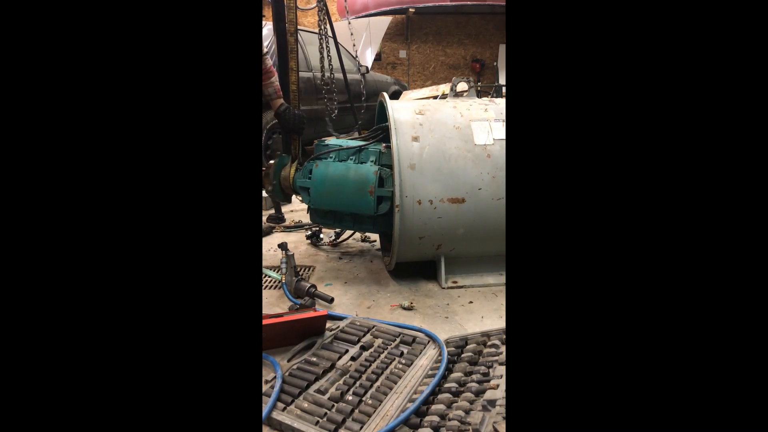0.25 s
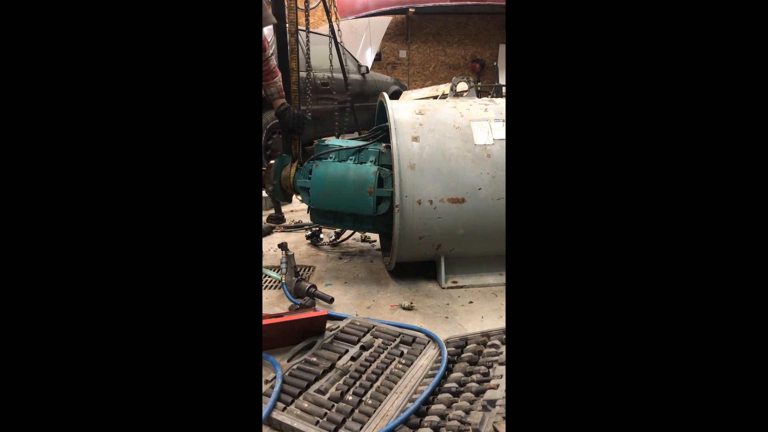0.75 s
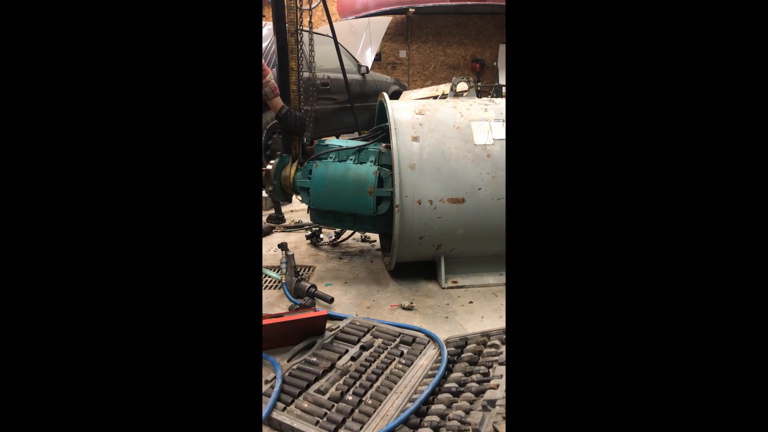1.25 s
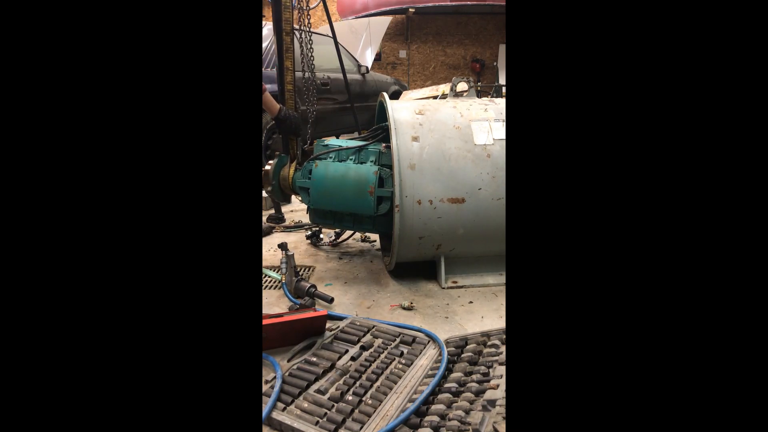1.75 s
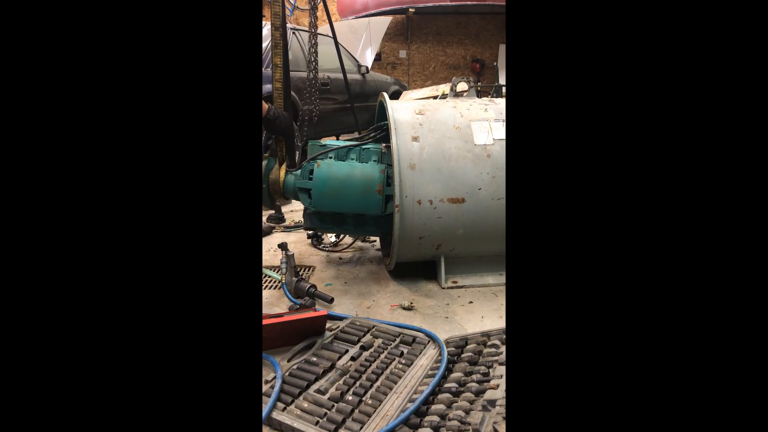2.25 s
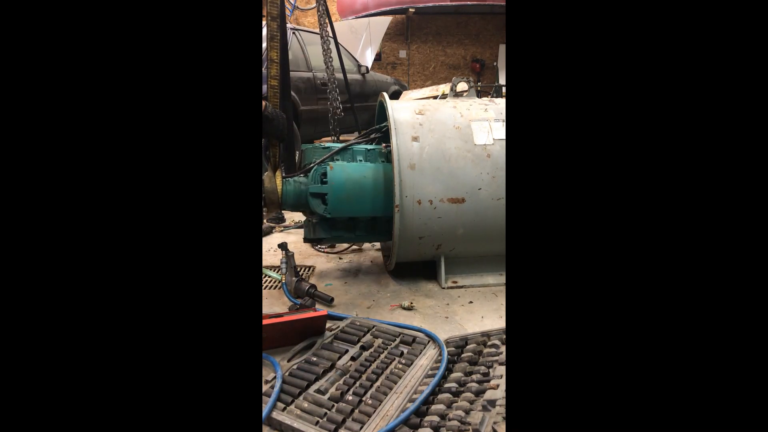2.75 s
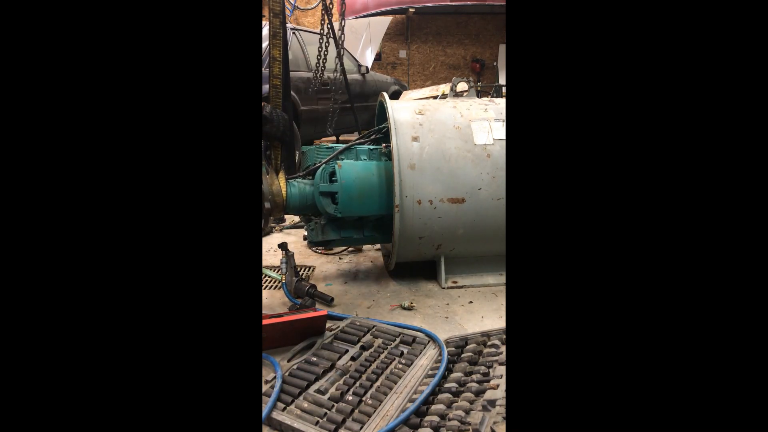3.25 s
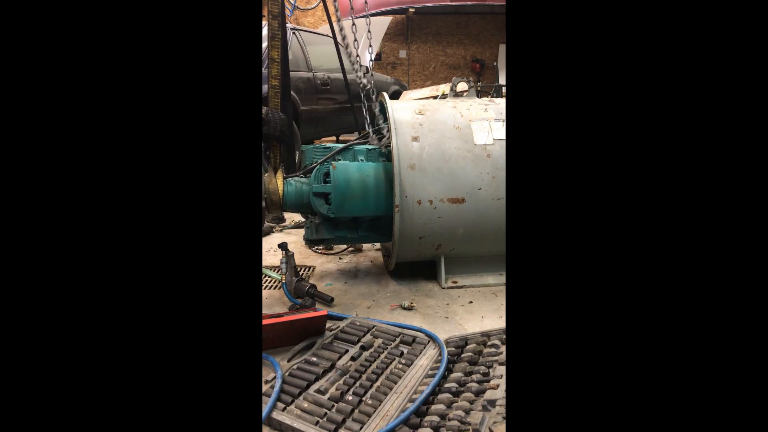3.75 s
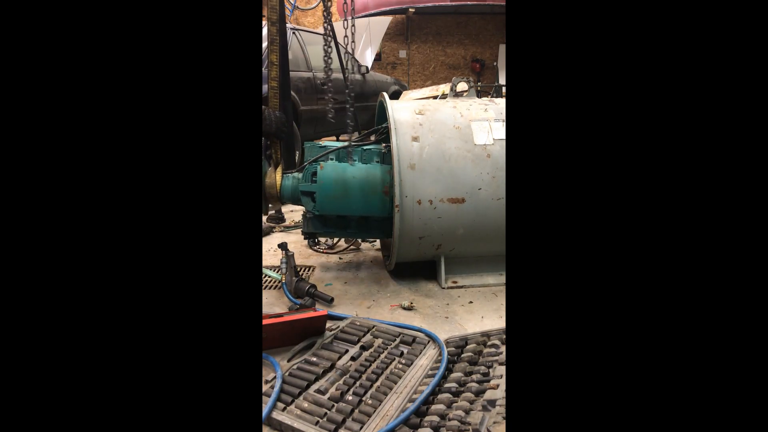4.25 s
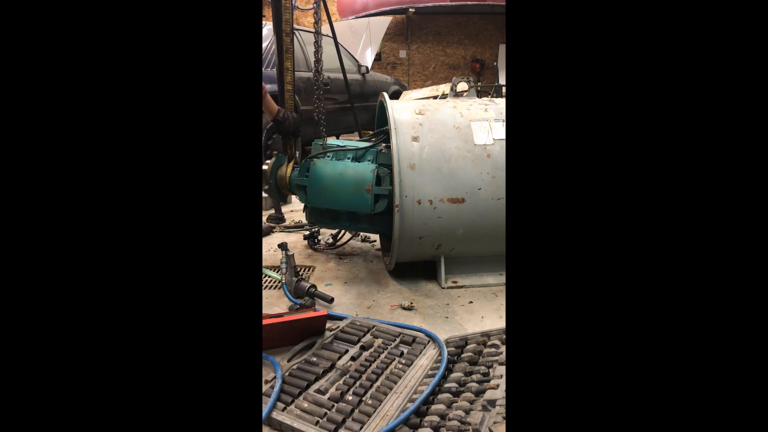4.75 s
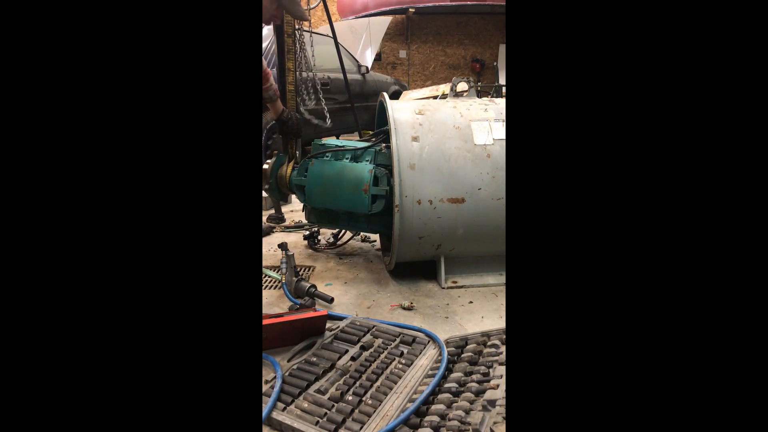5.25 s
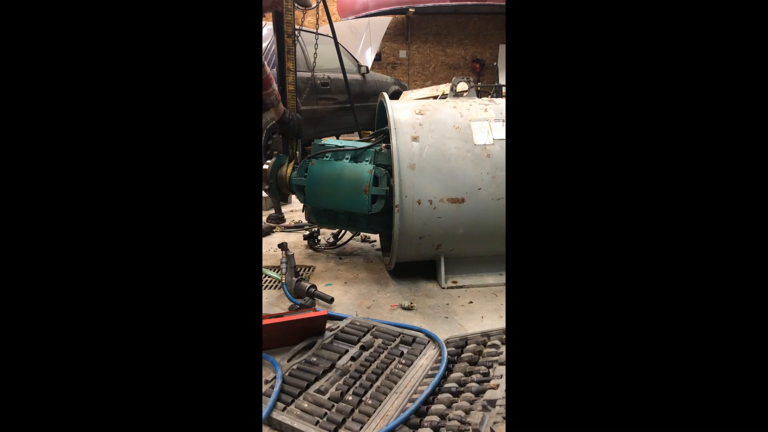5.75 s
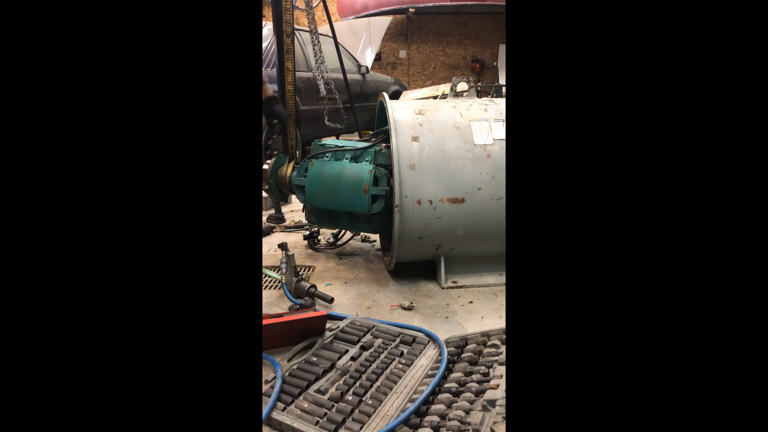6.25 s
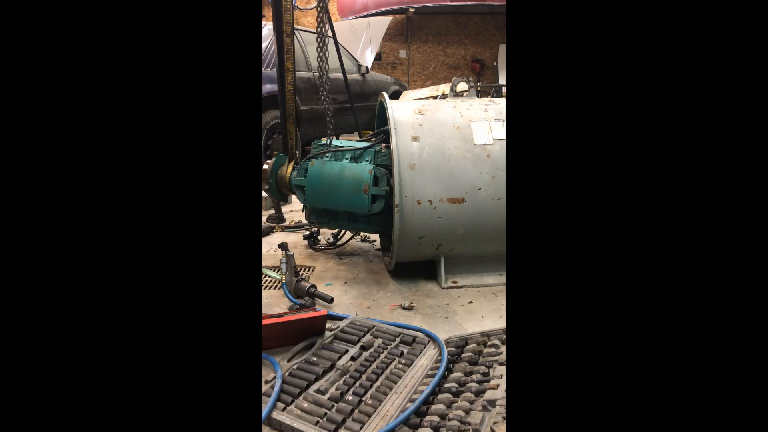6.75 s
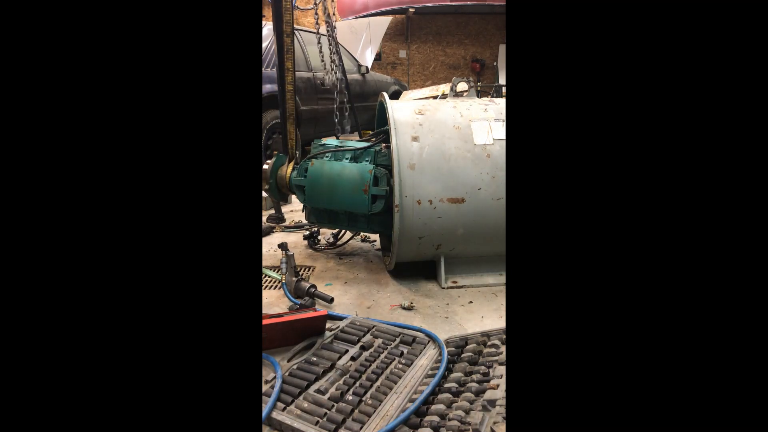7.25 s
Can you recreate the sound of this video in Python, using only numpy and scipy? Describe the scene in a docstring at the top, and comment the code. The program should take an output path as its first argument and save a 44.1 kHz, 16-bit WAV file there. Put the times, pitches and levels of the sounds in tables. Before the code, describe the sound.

A heavy rotor on a chain hoist is shifted in its steel housing in a workshop, heard in mono at fairly close range. At 0 s a short grind and chain rattle fade under small bright link clicks, with a tight cluster near 1.3 s. From 1.9 s stronger clinks arrive, and between 2.2 and 3.3 s rolling grinding, low rumble, soft knocks and chain rattle swell, with brief metallic squeaky tones. It thins out to sparse ticks around 3.4-4 s. Grinding returns from 4.3 to 5.2 s, with sharp clicks and a short tonal creak at 4.85 s. After a lull, chain slides in rapid blows on the housing from 5.55 s, then lands with a huge bright clang at 5.97 s. It rings on, with clinks at 6.2-6.6 s, and is damped after about 6.56 s. Faint air and a few last clicks near 7.4 s finish.

```python
"""A heavy rotor on a chain hoist is rolled in and out of its steel housing in a workshop, in mono.
Its grinding is random grit through bore resonances; the rolling drone and frame rumble are low noise.
Loose links click on each other or tap the housing, as noise bursts with beating rings, and rattle
as many tiny impacts. Slack chain slides down the housing and lands with a loud clang: clear modes and
dense overtones. Around it lie soft knocks, brief tones, air, and the echoes of the clicks in the shop."""
import sys
import numpy as np
from scipy import signal
from scipy.fft import rfft, irfft
from scipy.io import wavfile
from scipy.ndimage import uniform_filter1d

SR = 44100
rng = np.random.default_rng(int(sys.argv[2]) if len(sys.argv) > 2 else 0)


def wav_out(sig):
    """Save sig, one row per channel (or a flat mono array), as 16-bit PCM at SR to the path in sys.argv[1]."""
    wavfile.write(sys.argv[1], SR, np.round(np.clip(np.atleast_2d(sig).T, -1, 1) * 32767).astype(np.int16))


def decibels_to_gain(level_db):
    """Convert a level in decibels to a linear amplitude gain (20 dB per decade)."""
    exponent = np.asarray(level_db, float) / 20
    return 10 ** exponent


N = 330750   # samples, 7.5 s

# the load rolls out, then back in: (time [s], grinding level [dB], frame rumble level [dB])
ROLLING = [(0.0, -46, -38.5), (0.25, -60.5, -46.5), (0.95, -66.5, -63.5), (1.31, -63.5, -61),
           (1.86, -67, -76), (1.97, -66, -53), (2.25, -50, -46), (2.45, -58.5, -63), (2.59, -49, -47.5),
           (2.82, -43, -48.5), (3.22, -52.5, -45), (3.4, -57, -58), (3.94, -66.5, -72), (4.05, -64, -47.5),
           (4.21, -65.5, -56.5), (4.37, -47, -44), (4.68, -42.5, -53), (4.88, -42.5, -37.5),
           (5.02, -40, -44), (5.19, -52, -54), (5.53, -66.5, -63), (6.58, -61.5, -68.5), (7.1, -59, -66),
           (7.24, -72, -89), (7.36, -63, -50), (7.5, -78, -70)]
# stir of the slack chain: (time [s], rattle level [dB])
STIR = [(0.0, -38), (0.25, -61), (0.52, -51.5), (0.95, -71.5), (1.31, -52.5), (1.86, -70.5), (1.97, -58.5),
        (2.25, -46), (2.5, -56), (2.82, -42.5), (2.99, -36), (3.22, -44), (3.4, -63), (3.94, -57.5),
        (4.05, -53), (4.47, -48), (4.52, -46.5), (4.88, -44), (5.02, -45.5), (5.19, -60.5), (5.32, -71),
        (5.35, -54), (5.53, -59.5), (6.58, -53.5), (6.632, -45.5), (7.1, -64.5), (7.24, -70), (7.36, -55),
        (7.5, -47)]
# chain on housing: (time [s], nominal level [dB], brightness about 3 kHz [dB per octave])
BLOWS = [(5.551, -15, -0.5), (5.584, -12, -2), (5.62, -15.5, 0.5), (5.66, -12, -2.5), (5.736, -15.5, -0.5),
         (5.81, -18, -1.5), (5.88, -13.5, -2), (5.92, -13, 0.5), (5.953, -5, 0.5), (5.972, 2, 1),
         (5.982, -0.5, 5), (5.992, -6, 4), (6.602, -21, 0.5)]


def rms_one(x):
    """Scales a sound to rms 1."""
    return x / np.sqrt(np.mean(x ** 2) + 1e-20)


def at_hz(points, hz):
    """Reads a curve of (Hz, value) along log frequency."""
    return np.interp(np.log(hz), np.log(np.array(points)[:, 0]), np.array(points)[:, 1])


def in_time(rows):
    """Draws each column of a timed table as a curve over the scene."""
    s, *columns = np.transpose(rows)
    return [np.interp(np.arange(N) / SR, s, c) for c in columns]


def band(x, low_hz, high_hz):
    """Band-pass filter."""
    return signal.sosfilt(signal.butter(2, [low_hz, high_hz], "band", fs=SR, output="sos"), x)


def shaped(x, spectrum):
    """Colours a sound with a spectrum; rms 1."""
    hz = np.maximum(np.arange(N // 2 + 1) * SR / N, 10)
    return rms_one(irfft(rfft(x) * decibels_to_gain(at_hz(spectrum, hz)), N))


def drift(rate_hz):
    """Slow chance through a double one-pole low-pass, drawn at every 40th sample; spread 1."""
    r = np.exp(-80 * np.pi * rate_hz / SR)
    chance = rng.standard_normal(N // 40 + 2002)
    slow = signal.lfilter([1], [1, -2 * r, r * r], chance)[2000:]
    return np.interp(np.arange(N) / 40, np.arange(len(slow)), rms_one(slow))


def ring(strikes, hz, t60):
    """A damped resonance: a unit click sets a sine of height about 1 ringing."""
    r = decibels_to_gain(-60 / (t60 * SR))
    w = 2 * np.pi * hz / SR
    return signal.lfilter([0, np.sin(w)], [1, -2 * r * np.cos(w), r * r], strikes + 1e-18)


def resonate(x, peaks):
    """A sound through parallel resonances; rms 1."""
    return rms_one(sum(decibels_to_gain(db) * np.sqrt(width) * ring(x, hz, 1.7 / width) for hz, width, db in peaks))


def grains(per_s, spread_db, clump_db):
    """Random tiny impacts of uneven size, coming in clumps."""
    sizes = decibels_to_gain(spread_db * np.minimum(rng.exponential(1, N), 5)) * rng.choice([-1, 1], N)
    return sizes * (rng.random(N) < per_s * decibels_to_gain(clump_db * drift(15)) / SR)


def add(out, s, piece):
    """Lays a piece into the scene at s seconds."""
    at = round(s * SR)
    out[at:at + len(piece)] += piece[:N - at]


def workshop_air():
    """Steady coloured noise under everything."""
    # air spectrum, (frequency [Hz], relative level [dB])
    air_spectrum = [(18, -36.5), (30, -7), (86, 11), (632, 4.5), (760, -26), (962, -4.5), (2170, -12.5),
                    (4080, -7.5), (13000, -19), (16000, -15)]
    return decibels_to_gain(-64.5) * shaped(rng.standard_normal(N), air_spectrum)


def shop(x):
    """Workshop echoes: ten feedback delays, duller on every round, stepped block by block."""
    t60_s, wall_cut_hz, level_db = 0.62, 15500, -16
    out = np.zeros(N)
    dull = np.exp(-2 * np.pi * wall_cut_hz / SR)
    lags = (rng.uniform(.015, 0.041, 10) * SR).astype(int)
    for k, lag in enumerate(lags):
        loop, state = x.copy(), [0.]
        gain = decibels_to_gain(-60 * lag / SR / t60_s)
        for i in range(lag, N, lag):
            back, state = signal.lfilter([gain * (1 - dull)], [1, -dull], loop[i - lag:i], zi=state)
            loop[i:i + lag] += back[:N - i]
        out += (loop - x) * (-1) ** k   # echoes only
    return decibels_to_gain(level_db) * out


def brief_dips():
    """Gain of the noisy layers, whose level dips briefly in bell-shaped notches."""
    # centres of the dips: time [s]
    dip_times = [2.38, 2.982, 3.536, 3.619, 4.342, 4.87, 6.283, 6.415, 6.796]
    depth_db, spread_s = 13.5, .0065
    t = np.arange(N) / SR
    return decibels_to_gain(-depth_db * sum(np.exp(-.5 * ((t - s) / spread_s) ** 2) for s in dip_times))


def tones():
    """Brief tones stand out of the noise: each sine swells for a moment, wavers and dies."""
    # (time [s], pitch [Hz], nominal level [dB])
    tone_table = [(2.11, 1040, -47), (2.87, 990, -46), (2.87, 558, -41), (3.022, 1240, -44),
                  (3.026, 1506, -43), (3.07, 1270, -40), (3.14, 2780, -51), (3.319, 466, -42),
                  (3.419, 457, -53), (3.47, 446, -54.5), (4.04, 2200, -51), (4.046, 2870, -50),
                  (4.846, 1237, -33.5), (4.852, 1750, -40), (4.85, 2290, -35.5), (4.85, 3600, -40),
                  (5.002, 1750, -39.5), (5.06, 1750, -47), (5.972, 349, -45.5), (7.374, 1920, -46)]
    t60_s, swell_s = 0.11, 0.034
    out, t = np.zeros(N), np.arange(round(.5 * SR)) / SR
    noise = rng.standard_normal((len(tone_table), len(t)))
    wavers = 1 + .3 * rms_one(band(noise, 12, 80))
    for (s, hz, level_db), waver in zip(tone_table, wavers):
        envelope = decibels_to_gain(level_db + 19.5 - 60 * t / t60_s) * (1 - np.exp(-t / swell_s))
        add(out, s, waver * envelope * np.sin(2 * np.pi * hz * t))
    return out


def thuds():
    """The load knocks the frame: a soft low knock that sags in pitch, with a dull puff."""
    # (time [s], nominal level [dB], settled pitch [Hz])
    thud_table = [(1.299, -41, 434), (1.322, -38.5, 257), (1.618, -49.5, 260), (1.752, -53, 600),
                  (1.952, -32.5, 181), (2.33, -27.5, 270), (2.749, -30, 262), (2.894, -28.5, 170),
                  (3.172, -26, 199), (4.028, -41, 270), (5.869, -35.5, 165), (6.852, -42, 194),
                  (7.33, -44, 119.5)]
    t60_s, rise_s = .06, 0.0035
    out, t = np.zeros(N), np.arange(round(.3 * SR)) / SR
    puffs = rms_one(band(rng.standard_normal((len(thud_table), len(t))), 86, 400))
    sagging_t = t + 0.0021 * (1 - np.exp(-t / 0.0056))
    for (s, level_db, hz), puff in zip(thud_table, puffs):
        knock = np.sin(2 * np.pi * hz * sagging_t) + 0.66 * puff
        add(out, s, decibels_to_gain(level_db - 60 * t / t60_s) * (1 - np.exp(-t / rise_s)) * knock)
    return out


def clicks():
    """Links click on each other or tap the housing: a three-colour burst, brightest dying first, and a ring."""
    # (time [s], nominal level [dB], ring pitch [Hz], nominal bright edge level [dB],
    #  ring level re the nominal level [dB])
    click_table = [(0.0133, -27, 3490, -30.5, -12), (0.1195, -35, 3520, -38, -19),
                   (0.2299, -51, 5460, -34.5, -4), (0.2736, -37, 5930, -39, -13),
                   (0.367, -26, 6170, -39, -12.5), (0.4206, -28.5, 6740, -41, -16),
                   (0.4653, -27.5, 6120, -38, -12), (0.56, -38, 2900, -53, -18),
                   (0.631, -53, 7150, -37.5, -10), (0.6734, -45.5, 4190, -58, -3),
                   (0.721, -34.5, 4450, -39, -27), (1.2166, -49, 5230, -64, -2),
                   (1.0217, -38, 8000, -32.5, -19), (1.0347, -32, 6940, -32.5, -16),
                   (1.0826, -35, 6940, -39, -19), (1.121, -43, 4200, -47, -13),
                   (1.269, -24.5, 3330, -39, -13), (1.2844, -25, 3280, -51, -15.5),
                   (1.3005, -24.5, 2960, -35, -13), (1.4065, -43.5, 6200, -44, 3.5),
                   (1.5095, -34.5, 2930, -53, -9), (1.575, -46, 2840, -44, -24),
                   (1.8313, -38.5, 6250, -53, -9), (1.9024, -40, 6200, -55, -6),
                   (1.9248, -21, 4640, -23, -19), (1.9602, -38.5, 4150, -29, 0.5),
                   (2.1091, -16.5, 4300, -21.5, -14.5), (2.1378, -24, 4010, -26.5, -10.5),
                   (2.2221, -13, 5000, -19.5, -35), (2.2645, -41, 7300, -25.5, -17),
                   (2.2921, -21.5, 4160, -44, -16.5), (2.3148, -41, 3580, -29, -6),
                   (2.3428, -18.5, 6870, -27.5, -13), (2.53, -35, 3300, -35.5, -28),
                   (2.608, -41, 7100, -31, -9), (2.7871, -23, 3650, -24.5, -18),
                   (2.8257, -29, 2530, -31, -18), (2.8611, -23.5, 3090, -23.5, -12),
                   (2.998, -16.5, 3840, -64, -26), (3.0771, -14.5, 7030, -25, -18),
                   (3.2288, -25, 2835, -38, -11.5), (3.3016, -27, 3830, -44, -17),
                   (3.3795, -29, 3980, -36, -28), (3.5693, -39, 7800, -25.5, -10),
                   (3.597, -34, 7600, -32.5, -22), (3.7264, -39, 7000, -38, -14),
                   (3.7997, -34, 4020, -38, -17), (3.9674, -48, 4260, -41, -12),
                   (4.0317, -30, 4300, -57, -26), (4.0495, -25.5, 3170, -47, -11),
                   (4.1519, -19.5, 5120, -31.5, -23), (4.2188, -38, 5590, -36, -10),
                   (4.241, -27, 6160, -30.5, -21), (4.4982, -13.5, 6680, -23, -17),
                   (4.5632, -37, 3830, -27, -0.5), (4.7198, -26.5, 3540, -26.5, -9.5),
                   (4.8164, -44, 3180, -26, -26), (4.8838, -16, 2570, -26.5, -44),
                   (5.3389, -37, 4040, -57, -11.5), (6.219, -16, 3340, -26.5, -34),
                   (6.2429, -26, 3110, -26, -19), (6.3242, -22, 3050, -32, -24),
                   (6.442, -30, 3120, -37.5, -22), (6.495, -38, 3200, -28, -17),
                   (6.6033, -16.5, 5960, -32, -16.5), (6.6218, -17, 6180, -29, -21),
                   (6.8074, -38, 3270, -43, -23), (7.3062, -42.5, 7530, -37, -21),
                   (7.334, -45.5, 7000, -40.5, -17), (7.3788, -27, 6560, -43, -14),
                   (7.42, -16.5, 6220, -27, -26)]
    body_re_level_db, body_db_per_octave = -21.5, -7   # lower rings have more dull body
    # two more modes beside the main ring
    overtone_ratio, overtone_db, undertone_ratio, undertone_db = 1.3, -8, 0.55, -12.5
    out, t = np.zeros(N), np.arange(round(.3 * SR)) / SR
    noise = rng.standard_normal((len(click_table), len(t)))
    middle = rms_one(band(noise, 2550, 9600))
    edge = rms_one(band(noise, 6850, 19800))
    body = rms_one(band(noise, 744, 4280))
    beats = rms_one(band(noise, 15, 250))   # close modes beat against each other
    rise = 1 - np.exp(-t / 0.00097)
    for k, (s, level_db, hz, edge_db, ring_db) in enumerate(click_table):
        near_ring = rms_one(band(noise[k], hz / 1.71, hz * 1.69))
        colour = (1.53 + 5.4 * np.exp(-t / 0.00072)) * middle[k] + near_ring
        burst = decibels_to_gain(level_db - 19.5 - 60 * t / 0.075) * colour
        crack = np.exp(-t / 0.00057) + 0.23 * decibels_to_gain(-60 * t / 0.052)   # a crack leads
        burst += decibels_to_gain(edge_db + 10.0) * crack * edge[k]
        body_db = level_db + body_re_level_db + body_db_per_octave * np.log2(hz / 4000)
        burst += decibels_to_gain(body_db - 60 * t / 0.2) * body[k]
        turn = 2 * np.pi * hz * t
        ringing = (1 + .45 * beats[k]) * np.sin(turn)
        ringing += decibels_to_gain(overtone_db) * beats[k - 1] * np.sin(overtone_ratio * turn)
        ringing += decibels_to_gain(undertone_db) * np.sin(undertone_ratio * turn)
        add(out, s, rise * (burst + decibels_to_gain(level_db + ring_db - 60 * t / 0.082) * ringing))
    return out


def jingle():
    """Small contacts dealt to links of many sizes, each ringing briefly at its own pitch."""
    touches = grains(2500, spread_db=3.0, clump_db=3.5)
    dealt = rng.integers(0, 24, N)
    pitches = np.geomspace(1300, 9000, 24) * rng.uniform(1.0, 1.04, 24)
    return sum(ring(touches * (dealt == k), hz, 134.0 / hz) for k, hz in enumerate(pitches))


def chain_rattle():
    """Stirred slack chain: many small link contacts, dry and ringing, in one colour."""
    # (frequency [Hz], relative level [dB])
    rattle_spectrum = [(880, -2.5), (1500, -8), (2020, -10), (2570, -4.5), (2860, -4.5), (3200, -1.5),
                       (3800, -1.5), (4300, -1), (4800, -3.5), (9000, -4.5), (11700, -28.5), (19800, -120)]
    rattle_db, = in_time(STIR)
    links = rms_one(grains(2500, spread_db=-1.0, clump_db=5.0)) + 1.3 * rms_one(jingle())
    return decibels_to_gain(rattle_db) * shaped(links, rattle_spectrum)


def chain_sizzle():
    """The finest link contacts, top treble only; swings with the rattle about its mean."""
    re_rattle_db, follows, stir_mean_db = -6.0, 1, -45
    rattle_db, = in_time(STIR)
    sizzle_db = stir_mean_db + re_rattle_db + follows * (rattle_db - stir_mean_db)
    return decibels_to_gain(sizzle_db) * rms_one(band(grains(2000, spread_db=5.0, clump_db=7.5), 8000, 19845))


def stored(at, blow_db, t60, rise_s):
    """Amplitude of a vibration whose energy each blow tops up; it spreads over the shell, then dies."""
    energy, spread = np.zeros(N), np.exp(-1 / (rise_s * SR))
    energy[at] = decibels_to_gain(2 * blow_db)
    energy = signal.lfilter([1 - spread], [1, -spread], energy + 1e-18)
    return np.sqrt(signal.lfilter([1], [1, -decibels_to_gain(-120 / (t60 * SR))], energy))


def overtones():
    """Hundreds of close narrow modes at chance pitches over a noise bed; two unrelated sets."""
    hz = np.arange(N // 2 + 1) * SR / N
    lines = rng.random((2, len(hz))) < SR / N / 70   # one every 70 Hz on average
    lines = lines * decibels_to_gain(1.2 * rng.standard_normal((2, len(hz))))
    comb = uniform_filter1d(lines, size=90, axis=1)
    comb = uniform_filter1d(comb, size=90, axis=1)   # each about 12 Hz wide
    return rms_one(irfft(rfft(rng.standard_normal((2, N))) * (rms_one(comb) + .85), N))


def clang_rings():
    """Every chain blow feeds the clear modes of the housing, with strengths of its own."""
    # clear modes of the housing: pitch [Hz]
    mode_pitches = [963.5, 1233, 1496.5, 1514, 1630, 2212, 2353, 2612, 2721, 2982, 3115, 3240, 4050, 4430,
                    4605, 6155, 6445, 6570, 7968, 8150, 8490, 11250, 13374, 13418]
    # for each: (relative level [dB], t60 before damping [s], change under a light blow [dB])
    mode_table = [(-15, 2.45, 0.5), (-38.5, 0.34, 6.5), (0, 1.03, -18.5), (-8, 0.8, -8), (-14, 0.82, -5),
                  (-8.5, 0.46, -12.5), (-15.5, .3, -3), (-4, 0.36, -17.5), (-10, 0.37, -9), (-18, 0.2, 4.5),
                  (1.5, 0.78, -9), (-15, 0.75, 9), (-14, 0.61, -2), (-24, .33, 3), (-34, 0.54, 10),
                  (-17, 0.74, -2.5), (-18, 0.33, 1), (-15, 0.13, -1.5), (-6, 0.42, -10), (-8.5, 0.23, -3),
                  (-12, 0.3, 2.5), (-23.5, 0.37, -1), (-15.5, 0.37, -12.5), (-24.5, 0.24, -13.5)]
    light_blow_db = -6
    settles_s, damping_db_per_s = 6.56, 54   # the chain comes to rest on the housing and damps it
    s, level_db, bright_db = np.transpose(BLOWS)
    at, rings, t = np.round(s * SR).astype(int), np.zeros(N), np.arange(N) / SR
    luck_db = rng.normal(0, 0.34, (len(at), len(mode_table)))
    phase = rng.uniform(0, 2 * np.pi, len(mode_table))
    for k, (hz, (mode_db, t60, light_db)) in enumerate(zip(mode_pitches, mode_table)):
        blow_db = level_db + mode_db - 21.5 + bright_db * np.log2(hz / 3000) + luck_db[:, k]
        blow_db += light_db * (level_db < light_blow_db)
        waver = decibels_to_gain(np.log2(hz / 600) * drift(18))   # faint neighbours make high rings unsteady
        rings += stored(at, blow_db, t60, 31.0 / hz) * waver * np.sin(2 * np.pi * hz * t + phase[k])
    return rings * decibels_to_gain(-damping_db_per_s * np.maximum(t - settles_s, 0))


def clang_wash():
    """Every chain blow feeds the dense overtones of the shell, dying band by band."""
    # dense overtones: (frequency [Hz], relative level [dB])
    shell_spectrum = [(120, -70), (250, -21.5), (700, -18), (1370, -5), (1450, -0.5), (1740, -7),
                      (2380, -6.5), (3190, 1.5), (4350, -8), (8270, -6), (10300, -16), (13800, -14),
                      (16000, -31)]
    # their decay: (frequency [Hz], t60 [s])
    shell_decay = [(400, 0.22), (1500, 0.88), (4000, 0.6), (8000, 0.45), (15000, 0.098)]
    s, level_db, bright_db = np.transpose(BLOWS)
    at, wash = np.round(s * SR).astype(int), np.zeros(N)
    edges = 250 * 2 ** np.arange(0, 6.5, .5)   # half-octave bands
    modes = overtones()
    for k, (low, high) in enumerate(zip(edges, edges[1:])):
        hz = np.sqrt(low * high)
        blow_db = level_db - 9 + at_hz(shell_spectrum, hz) + bright_db * np.log2(hz / 3000)
        envelope = stored(at, blow_db, at_hz(shell_decay, hz), 0.0032)
        wash += envelope * band(modes[k % 2], low, high)
    return band(wash, 450, 19000)


def frame_rumble():
    """The hoist frame rumbles: noise pushes a 62 Hz resonance, with some low noise beside it."""
    _, rumble_db = in_time(ROLLING)
    push = rng.standard_normal(N)
    rumble = rms_one(ring(push, 62, .2)) + .5 * rms_one(band(push, 40, 115))
    return decibels_to_gain(rumble_db) * rms_one(band(rumble, 36, 120))


def rolling_drone():
    """Drone of the rolling rotor: lumps strike low resonances; swings with the grinding about its mean."""
    # rolling resonances: (pitch [Hz], nominal width [Hz], relative level [dB])
    drone_peaks = [(172, 83, -1.5), (273.6, 18, -4.5), (333, 63, -3)]
    re_grind_db, follows, roll_mean_db = -3, 1.11, -46
    leads_s = 0.082   # the drone swells before the grinding bites
    grind_db, _ = in_time(ROLLING)
    coming_db = np.interp(np.arange(N) + leads_s * SR, np.arange(N), grind_db)
    drone_db = roll_mean_db + re_grind_db + follows * (coming_db - roll_mean_db)
    lumps = grains(400, spread_db=3.0, clump_db=4.0)
    drone = band(resonate(lumps, drone_peaks) + 0.073 * rms_one(band(lumps, 110, 310)), 100, 540)
    return decibels_to_gain(drone_db) * rms_one(drone)


def rotor_grinding():
    """The rotor grinds along the bore: grit impacts, coloured broadly and through bore resonances."""
    # (frequency [Hz], relative level [dB])
    grind_spectrum = [(240, -40.5), (400, -5.5), (1040, -1), (1580, -7), (2460, -13), (5000, -25),
                      (6500, -45.5), (11000, -120)]
    # bore resonances: (pitch [Hz], nominal width [Hz], relative level [dB])
    bore_peaks = [(510, 94, 9.5), (990, 13, 5), (1240, 180, -8.5), (1750, 14, -5.5), (2290, 21, -28.5),
                  (2870, 78, -5.5)]
    grind_db, _ = in_time(ROLLING)
    grit = grains(6000, spread_db=2.0, clump_db=2.0)
    grind = shaped(grit, grind_spectrum) + 0.55 * band(resonate(grit, bore_peaks), 850, 4700)
    return decibels_to_gain(grind_db) * rms_one(grind)


def scene():
    """Mixes the layers; the dips touch only the noisy ones, the shop echoes only the clicks."""
    hits = clicks()
    noisy = workshop_air() + hits + shop(hits) + chain_rattle() + chain_sizzle()
    noisy += clang_wash() + rotor_grinding()
    steady = tones() + thuds() + clang_rings() + frame_rumble() + rolling_drone()
    return (steady + brief_dips() * noisy)[None]


def roll_off(x):
    """The treble ends steeply here."""
    return signal.sosfilt(signal.butter(12, 16980, fs=SR, output="sos"), x)


def record(dry):
    """The microphone channel loses its top treble: a steep low-pass, 50 dB down from 16536 Hz."""
    cut = signal.sosfilt(signal.cheby2(10, 50, 16536, fs=SR, output="sos"), dry)
    return roll_off(cut)


dry = scene()
out = record(dry)
wav_out(out)
```